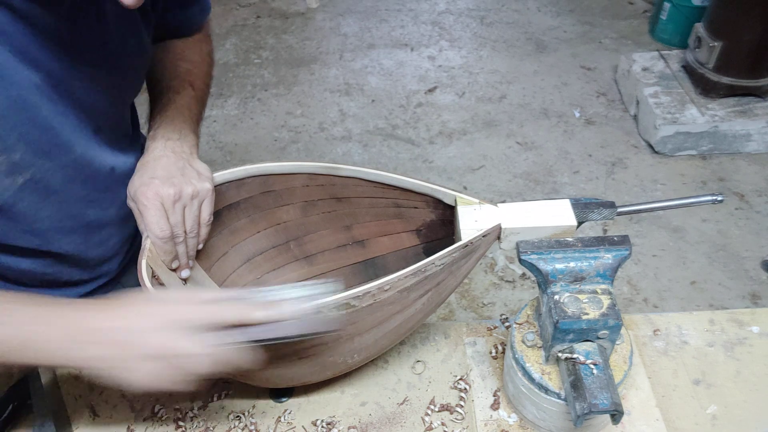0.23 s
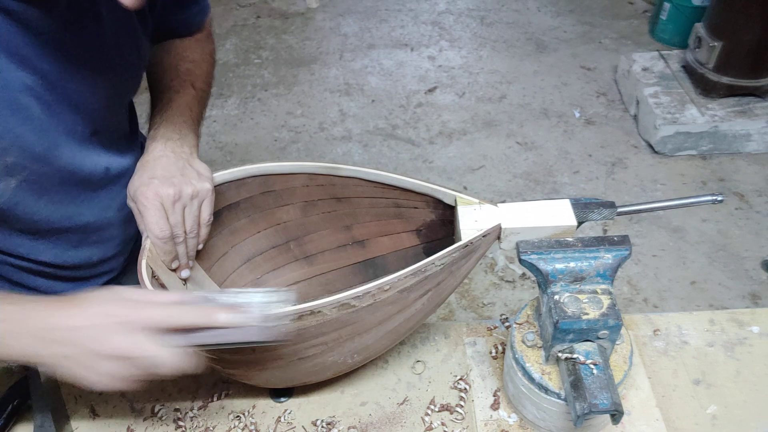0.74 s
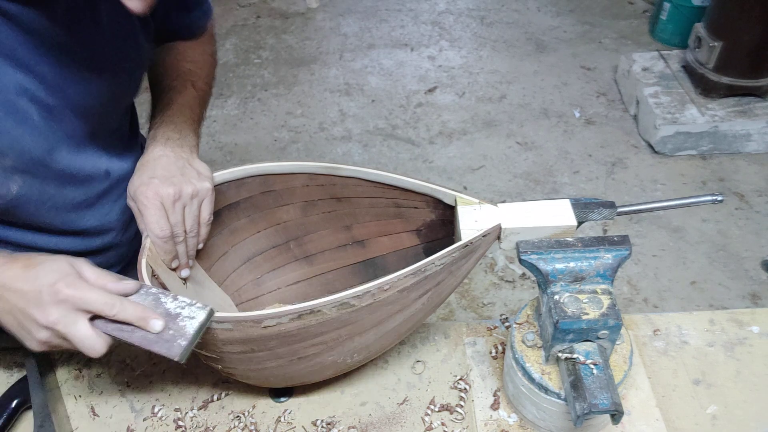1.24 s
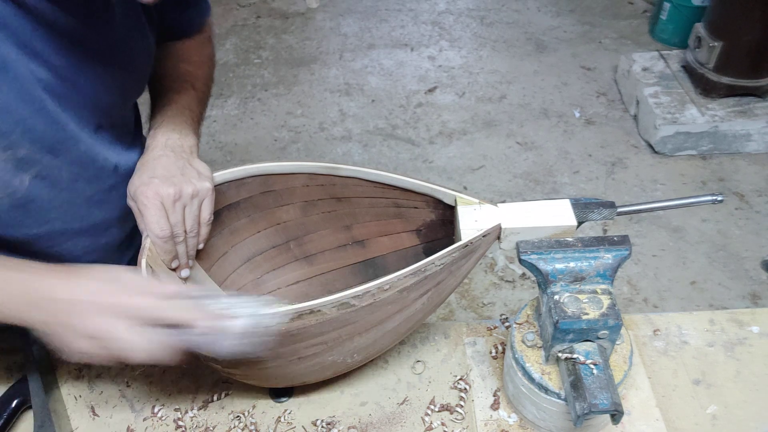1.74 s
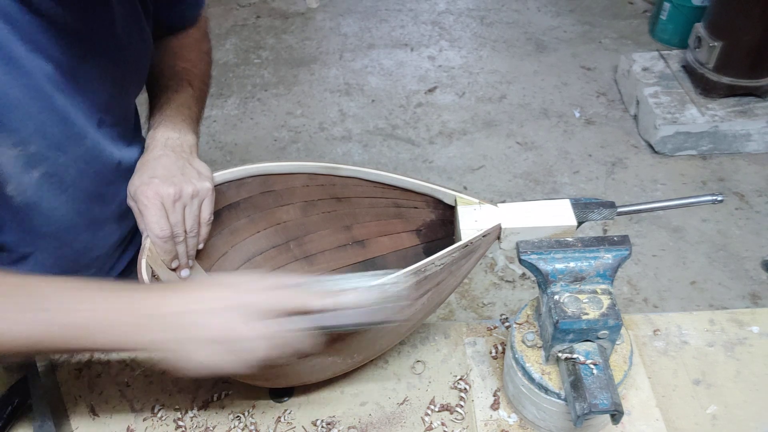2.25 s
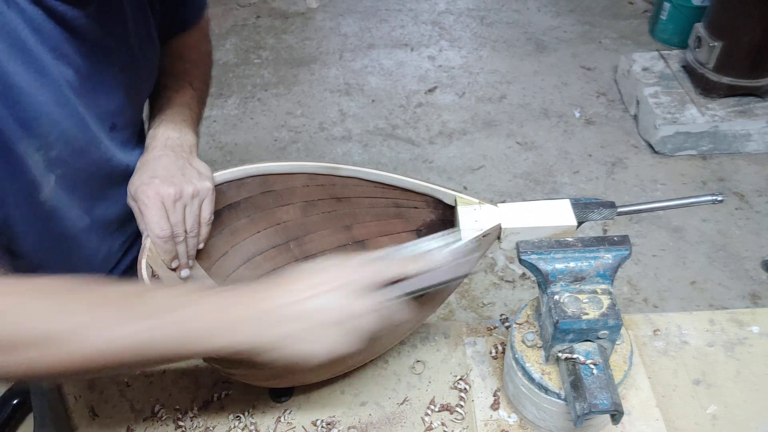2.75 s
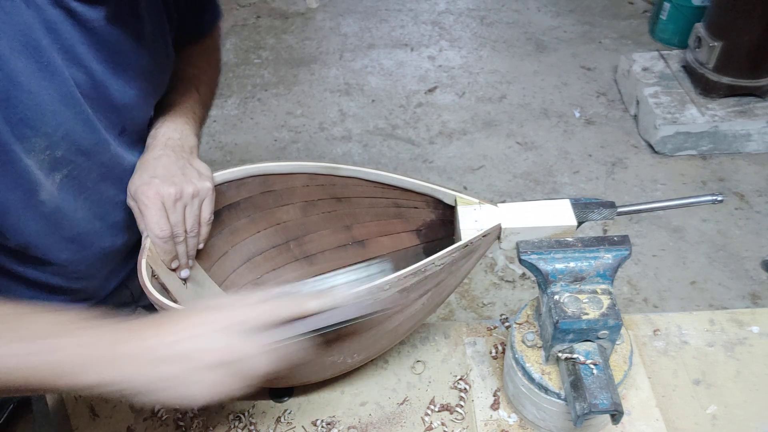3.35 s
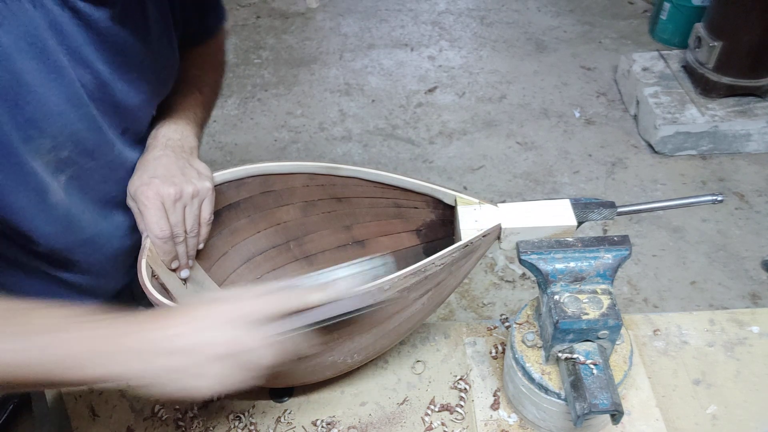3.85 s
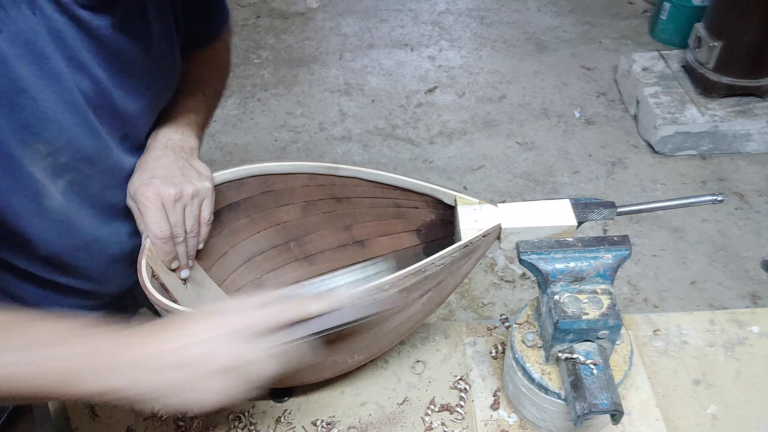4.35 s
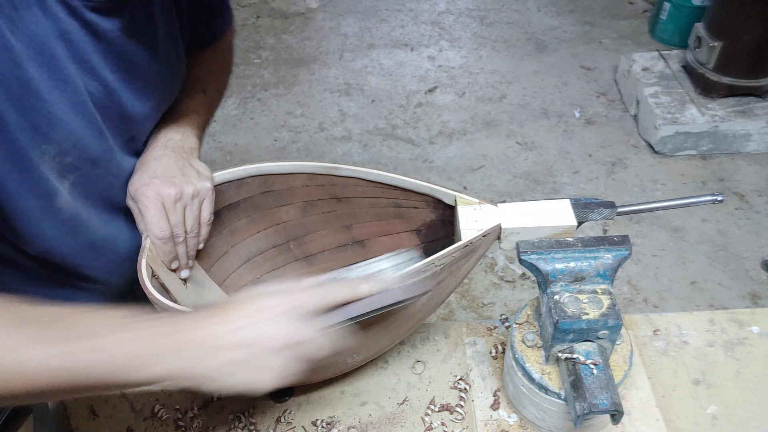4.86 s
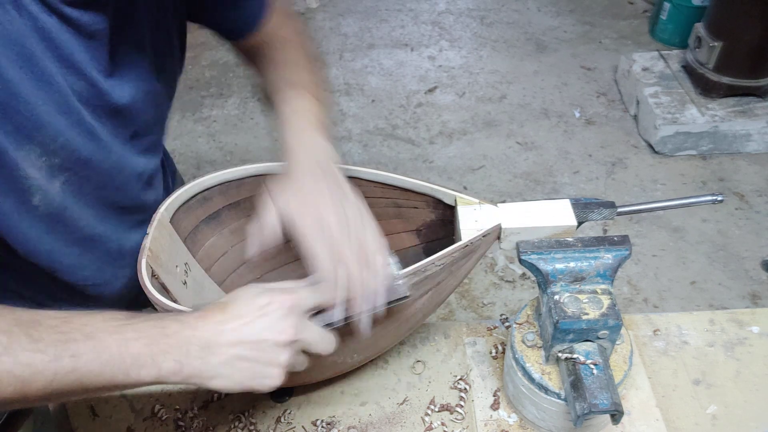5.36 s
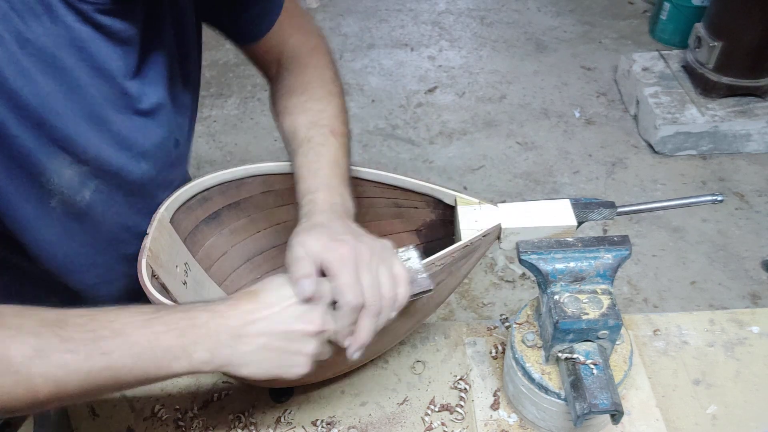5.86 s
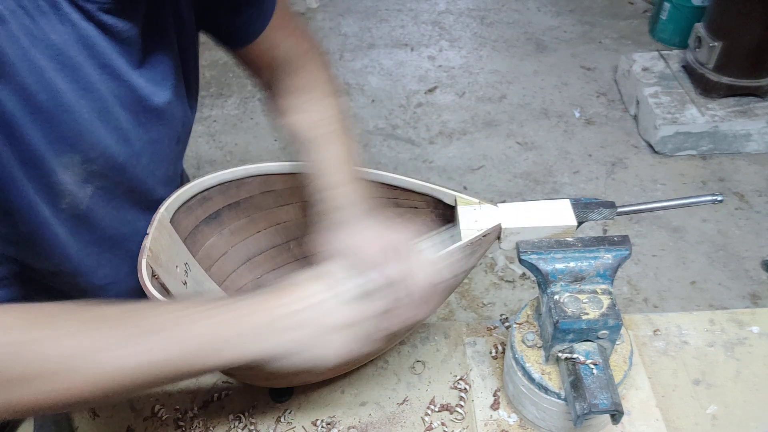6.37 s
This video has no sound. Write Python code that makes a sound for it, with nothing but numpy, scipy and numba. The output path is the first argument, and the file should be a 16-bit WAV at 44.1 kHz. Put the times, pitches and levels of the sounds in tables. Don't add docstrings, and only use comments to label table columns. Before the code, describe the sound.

Sandpaper on a block rubs briskly back and forth along a thin wooden shell's rim, raspy and hollow, in a slightly echoing workshop.

```python
import sys
import numpy as np
from scipy import signal
from scipy.fft import rfft, irfft
from scipy.io import wavfile
from scipy.ndimage import uniform_filter1d
from numba import njit

SR = 44100
rng = np.random.default_rng(int(sys.argv[2]) if len(sys.argv) > 2 else 0)


def elevation(decibels):
    levels = np.asarray(decibels, float)
    return 10 ** (levels / 20)


def waveform_to_disk(signal):
    frames = np.transpose(np.atleast_2d(signal))
    scaled = np.clip(frames, -1, 1) * 32767
    samples = np.round(scaled).astype(np.int16)
    wavfile.write(sys.argv[1], SR, samples)


N = 292383

# (frequency [Hz], level [dB])
FLAT = [(20, 0), (20000, 0)]


def level(x, db):
    return x * elevation(db) / np.sqrt(np.mean(x ** 2))


def along(table, hz):
    at, value = np.transpose(table)
    return np.interp(np.log(hz + 1), np.log(at), value)


def walk(rate):
    hold = int(SR / rate)
    steps = np.repeat(rng.standard_normal(N // hold + 1), hold)
    return 0.78 * uniform_filter1d(uniform_filter1d(steps, hold), hold)[:N]


def ports(pair, left_db=FLAT, right_db=FLAT):
    # (frequency [Hz], share common to both ports [0-1])
    likeness = [(60, 1), (130, 0.99), (290, 0.96), (640, 0), (1410, 0.55), (3100, 0.03), (6820, -0.0),
                (15000, 0.01)]
    # (frequency [Hz], phase by which the left port leads [rad])
    lead = [(300, 0.23), (450, -0.084), (700, -0.41), (1460, 1), (2900, 0.47), (16000, 0.36)]
    hz = np.arange(N // 2 + 1) * SR / N
    like = np.clip(along(likeness, hz), 0, 1) ** .5
    mid = rfft(pair[0]) * np.sqrt(1 + like)
    side = rfft(pair[1]) * np.sqrt(1 - like)
    left = (mid + side) * elevation(along(left_db, hz)) * np.exp(1j * along(lead, hz))
    right = (mid - side) * elevation(along(right_db, hz))
    return np.array([irfft(left, N), irfft(right, N)])


def air():
    # (frequency [Hz], level [dB])
    colour = [(20, -9), (38, -3), (48, -10), (60, -2.5), (72, -19), (85, -7.5), (108, -1), (150, -7.5),
              (200, -10), (600, -8), (3000, -31.5), (16000, -52)]
    return level(ports(rng.standard_normal((2, N)), colour, colour), -44) * elevation(2.1 * walk(3.39))


def room(dry, count=4):
    # (frequency [Hz], time to fall by 60 dB [s])
    decay = [(200, 1), (1000, 0.34), (4000, 0.31), (16000, 0.14)]
    t = np.arange(SR // 2) / SR
    noise = ports(rng.standard_normal((2, N)))[:, :count * len(t)].reshape(2, count, -1)
    onset = np.clip(t / 0.011, 0, 1)
    tails = 0
    for hz in 125 * 2. ** np.arange(8):
        edges = [hz / 2 ** .5, min(hz * 2 ** .5, 21000)]
        sos = signal.butter(2, edges, "band", fs=SR, output="sos")
        tails = tails + signal.sosfilt(sos, noise) * elevation(-60 * t / along(decay, hz)) * onset
    tails = tails * elevation(-10) / np.sqrt(np.sum(tails ** 2) / (2 * count))
    blend = np.array([walk(9) for _ in range(count)])
    blend = blend / np.sqrt(np.sum(blend ** 2, axis=0))
    return sum(signal.fftconvolve(dry * blend[k], tails[:, k], axes=1)[:, :N] for k in range(count))


def bench(near, place):
    port_ms = np.array([1.307, 1.7])[:, None]
    lag = (port_ms + 0.26 * (place + 0.36 * walk(4))) * SR / 1000
    n = np.arange(N)
    return elevation(-13) * np.array([np.interp(n - d, n, x) for x, d in zip(near, lag)])


def rocking():
    # (time [s], peak level [dB], frequency [Hz])
    rocks = [(0.267, -40, 53.8), (0.419, -52, 59.2), (0.573, -47, 35.0), (0.823, -37, 53.8),
             (1.281, -46, 26.9), (1.72, -44, 78.1), (2.801, -41, 49.3), (3.064, -43, 59.2),
             (3.295, -36, 51.7), (3.564, -36, 78.1), (3.804, -42, 61.9), (4.306, -50, 78.1),
             (4.577, -52, 29.6), (4.809, -36, 45.8), (5.065, -44, 29.6), (5.252, -40, 35.0),
             (5.546, -58, 75.4), (5.792, -36, 45.6), (5.901, -35, 40.4), (6.026, -36, 40.6),
             (6.205, -47, 51.1), (6.447, -37, 40.4)]
    out, t = np.zeros(N + SR), np.arange(SR // 4) / SR
    swell = (t / .025) * np.exp(1 - t / 0.025)
    for s, db, hz in rocks:
        start = int(s * SR)
        out[start:start + len(t)] += elevation(db - 6.5) * np.sin(2 * np.pi * hz * t) * swell
    return out[:N]


def strokes(t):
    # (start [s], hiss level [dB], shell boom over hiss [dB],
    # rim ring over hiss [dB], rim ring centre [Hz])
    pushes = [(0.034, -22.5, -10, -6.5, 1290), (0.577, -22, -9.5, -4.5, 1200),
              (1.122, -23.5, -9.5, -4.5, 1210), (1.731, -21.5, -12, -4.5, 1190),
              (2.284, -22, -11, -3.5, 1160), (2.836, -24.5, -12, -1.9, 1180),
              (3.339, -23.5, -11, -2.5, 1200), (3.845, -23, -11.5, -3.5, 1280),
              (4.351, -23.5, -11.5, -2.8, 1220), (4.849, -25, -10.5, -2, 1340),
              (5.293, -26.5, -5.5, -0.6, 1300), (5.834, -25, -7.5, -3, 1490),
              (6.238, -25, -9.5, -3.5, 1390), (6.675, -25, -11, -4, 1450)]
    pulls = [(-0.22, -22.5, -10, -1.5, 1300), (0.29, -22, -12, -5.5, 1250), (0.834, -22.5, -12, -4.5, 1300),
             (1.41, -21, -8, -5, 1240), (1.97, -22, -11.5, -5, 1290), (2.54, -21.5, -12, -4, 1250),
             (3.081, -22.5, -11, -4.5, 1270), (3.588, -22, -13.5, -3.5, 1290),
             (4.092, -22.5, -16, -6, 1350), (4.59, -22.5, -13, -5, 1280), (5.072, -23.5, -10, -3.5, 1330),
             (5.557, -23.5, -12, -1.5, 1470), (6.033, -24.5, -9.5, -1.5, 1460), (6.453, -24, -11, 1, 1520)]
    # (time [s], boom centre [Hz], belly coupling [dB], top fizz over hiss [dB])
    grip = [(0.0, 303, 7, -6.5), (0.3, 293, 3, -8), (0.6, 300, 7.5, -7.5), (1.2, 299, 0.1, -7),
            (1.55, 312, 7.5, -7.5), (1.85, 294, 1, -8), (2.15, 303, 6, -6), (2.5, 303, 2.5, -7.5),
            (2.9, 307, 6, -5.5), (3.2, 302, 4.5, -5.5), (3.6, 301, 2.5, -5.5), (4.1, 293, 4, -5),
            (4.6, 301, 5, -5.5), (5.2, 307, 3, -4), (5.6, 304, 3.5, -5.5), (5.9, 306, -1.5, -3.5),
            (6.2, 306, -0.5, -3.5), (6.63, 308, -1.5, -4)]
    # (time [s], boom gain [dB], ring gain [dB], ring centre [Hz])
    bites = [(0.245, 0.1, 5, 1290), (0.66, -2, 2.5, 1100), (1.28, -1, 3.5, 1120), (1.48, 5, -1, 1230),
             (1.59, 1, 3, 1120), (1.783, 11, 9.5, 1080), (1.855, 4, 4, 1420), (2.22, 1.5, 4.5, 1100),
             (2.4, 7, 2, 1140), (2.97, 8, 2.5, 1100), (3.43, 8, 0.5, 1180), (4.03, 10, 3.5, 1280),
             (4.53, -2, 5, 1120), (5.74, 3.5, 2.5, 1540), (6.57, 1.5, 0.5, 1560)]
    # (time [s], length [s], hiss gain [dB])
    dwells = [(0.247, 0.025, 2.5), (0.343, 0.03, 2.5), (0.57, 0.03, 0), (0.9, 0.026, 1.5), (1.273, 0.04, 0),
              (1.423, 0.055, -5), (1.86, 0.019, 0), (2.287, 0.015, -0.5), (2.6, 0.025, 1.5),
              (3.43, 0.057, -1.5), (5.332, 0.027, 2), (5.507, 0.04, -3.5), (5.59, 0.039, -9),
              (6.03, 0.011, -5), (6.535, 0.03, 1)]
    rows = np.array([row for pair in zip(pulls, pushes) for row in pair])
    count = np.interp(t, rows[:, 0], np.arange(len(rows)))
    k = count.astype(int)
    share, pull = count - k, 1 - k % 2
    lean, power = np.array([-0.28, 0.23])[pull], np.array([0.95, 1.153])[pull]
    speed = np.sin(np.pi * (share + lean * share * (1 - share))) ** power
    speed_db = 10 * np.log10(speed ** 2 + elevation(-17) ** 2)
    place = np.cos(np.pi * count)
    way = uniform_filter1d(1. * pull, SR // 20)
    hiss_db, boom_db, ring_db, ring_hz = (uniform_filter1d(c[k], SR // 20) for c in rows.T[1:])
    grip_s, *grip_columns = np.transpose(grip)
    boom_hz, belly_db, fizz_db = (np.interp(t, grip_s, c) for c in grip_columns)
    for s, boom_gain_db, ring_gain_db, bite_hz in bites:
        bite = np.exp(-.5 * ((t - s) / 0.022) ** 2)
        ring_hz = ring_hz + (bite_hz - ring_hz) * bite
        belly_db = belly_db - ring_gain_db * bite
        boom_db = boom_db + boom_gain_db * bite
        ring_db = ring_db + ring_gain_db * bite
    for s, length, gain_db in dwells:
        hiss_db = hiss_db + gain_db * np.exp(-.5 * ((t - s) / length) ** 2)
    hiss = elevation(hiss_db + speed_db)
    boom_db, ring_db = boom_db - 0.59 * speed_db, ring_db - 0.32 * speed_db
    fizz_db = fizz_db + 0.25 * speed_db + 2 * way
    belly_db = belly_db + 5 * place
    ring_hz = ring_hz * (1 + 0.014 * place)
    block_hz = np.interp(way, (0, 1), (2945, 3237)) * (1 - 0.00014 * place)
    belly_hz = np.interp(way, (0, 1), (583, 723)) * (1 - 0.13 * place)
    return place, hiss, boom_db, ring_db, fizz_db, ring_hz, boom_hz, belly_db, block_hz, belly_hz


def grit(spread_db):
    size = np.minimum(rng.exponential(size=N), 5)
    return level(rng.standard_normal((2, N)) * elevation(spread_db * size), 0)


@njit
def svf(x, hz, width):
    y, band, low = np.empty(len(x)), 0., 0.
    for i in range(len(x)):
        g, k = np.tan(np.pi * hz[i] / SR), width / hz[i]
        v = (band + g * (x[i] - low)) / (1 + g * (g + k))
        band, low, y[i] = 2 * v - band, low + 2 * g * v, k * v
    return y


def modes(x, table, near_hz, reach, patchy_db):
    out = 0
    for hz, width, db in table:
        octaves = np.log2(hz / near_hz)
        share_db = db - 6 * np.minimum((octaves / reach) ** 2, 2.5) + patchy_db * walk(7.6)
        bend = hz * (1 + 0.011 * walk(5))
        patch = np.roll(x, rng.integers(N), axis=1)
        out = out + elevation(share_db) * np.array([svf(path, bend, 1. * width) for path in patch])
    return out


def sanding(hiss, boom_db, ring_db, fizz_db, ring_hz, boom_hz, belly_db, block_hz, belly_hz):
    # (frequency [Hz], width [Hz], level [dB]); same columns for the next three
    shell = [(274, 14.6, -0.5), (298, 33, -4.5), (329.7, 14.7, 2), (393, 45, -3)]
    ribs = [(1005, 40, -1.5), (1072, 28, 2.5), (1200, 34, 0.5), (1320, 50, -3), (1445, 40, 2.5),
            (1578, 34, 3), (1690, 70, -6), (1810, 60, -2)]
    belly_modes = [(395, 62, 1), (498, 40, -1.5), (566, 30, -7), (720, 54, -9), (735, 65, -2.5),
                   (811, 20, 4.5), (884, 46, 5)]
    block = [(1855, 180, 1.5), (2320, 260, -4.5), (2620, 78, 0), (2904, 137, 2.5), (3476, 71, -3.5),
             (4300, 290, -20.5), (4540, 360, -5.5), (5670, 310, 0), (6260, 280, 3.5), (7050, 380, 6),
             (7800, 560, -2)]
    # (frequency [Hz], level [dB])
    left_hiss = [(120, -23), (620, -12), (1100, -6), (2000, 1), (3500, 0.5), (6000, -2.5), (9000, -3.5),
                 (10500, -2.5), (13500, -0.1), (14500, -5.5), (16300, -4.5)]
    right_hiss = [(120, -23), (620, -18), (1100, 0), (2000, 0.5), (3500, 4), (5200, 0), (6500, 6),
                  (8100, 6), (9000, -5), (10200, -4.5), (12000, -14), (15800, -27)]
    # (frequency [Hz], gain [dB])
    shade = [(400, 0.04), (500, -2.5), (650, 2.5), (820, 3.5), (990, 3), (1080, 1), (1420, 0.5), (1580, -6),
             (1820, -8), (1960, 2.5), (2650, -2.5), (3300, -1), (3480, -1.5), (3750, -0.5)]
    force = grit(spread_db=1.35)
    chatter = elevation(0.69 * walk(60))
    block_spot = 3080 * (block_hz / 3080) ** 2.7
    ring_spot = 1290 * (ring_hz / 1290) ** 2.03
    belly_spot = 620 * (belly_hz / 620) ** 1.12
    boom_spot = 301 * (boom_hz / 301) ** 2.9
    buzz = modes(force, block, block_spot, reach=0.86, patchy_db=2.5)
    rasp = ports(force + elevation(3.5) * buzz, left_hiss, right_hiss)
    top = signal.sosfiltfilt(signal.butter(4, 9000, "high", fs=SR, output="sos"), rasp)
    ring = ports(modes(force, ribs, ring_spot, reach=0.79, patchy_db=3.5))
    ring = signal.sosfilt(signal.butter(3, 820, "high", fs=SR, output="sos"), ring)
    belly = ports(modes(force, belly_modes, belly_spot, reach=0.68, patchy_db=6.0))
    boom = ports(modes(force, shell, boom_spot, reach=0.27, patchy_db=3.5))
    wood = elevation(ring_db) * (level(ring, -0.52) + elevation(belly_db) * level(belly, -16))
    wood = wood + elevation(boom_db) * level(boom, -1.5)
    fizz = elevation(fizz_db) * level(top, 3.76)
    left, right = hiss * chatter * (level(rasp - top, 0.77) + fizz + wood)
    hz = np.arange(N // 2 + 1) * SR / N
    return np.array([left, irfft(rfft(right) * elevation(along(shade, hz)), N)])


def scene():
    place, *controls = strokes(np.arange(N) / SR)
    near = sanding(*controls)
    return near + room(near) + rocking() + air() + bench(near, place)


def roll_off(x):
    return signal.sosfilt(signal.butter(12, 16030, fs=SR, output="sos"), x)


def record(dry):
    cut = signal.sosfilt(signal.ellip(14, .3, 70, 15730, fs=SR, output="sos"), dry)
    return roll_off(cut)


dry = scene()
out = record(dry)
waveform_to_disk(out)
```